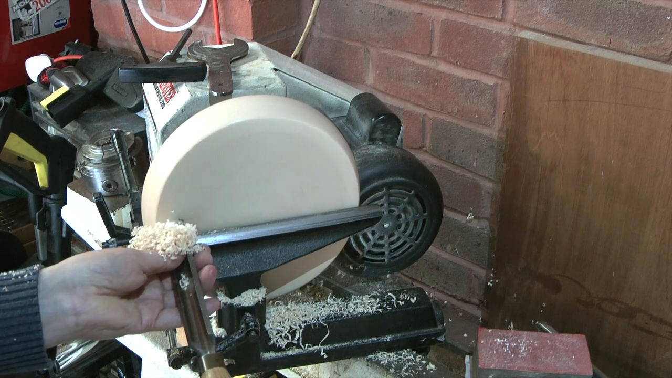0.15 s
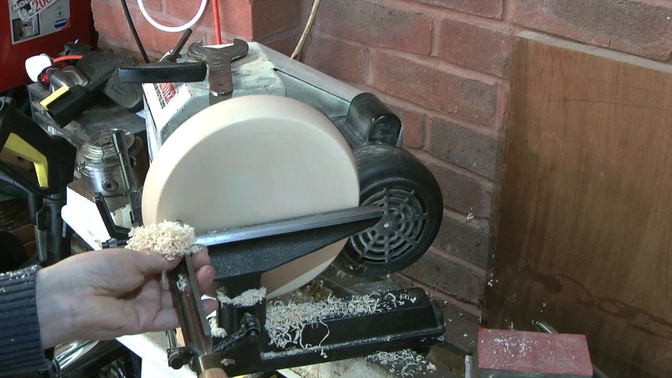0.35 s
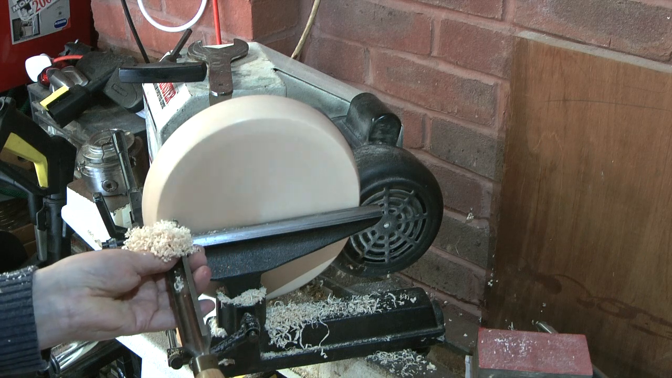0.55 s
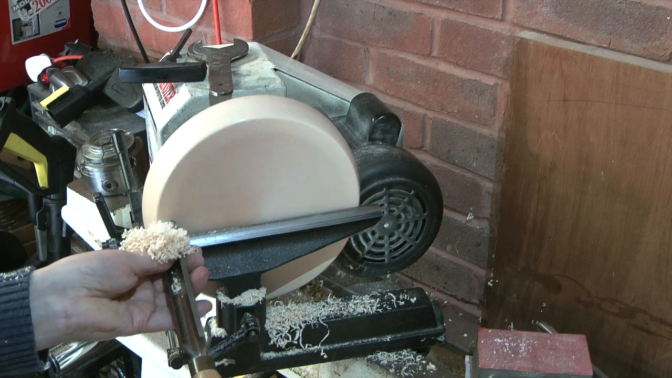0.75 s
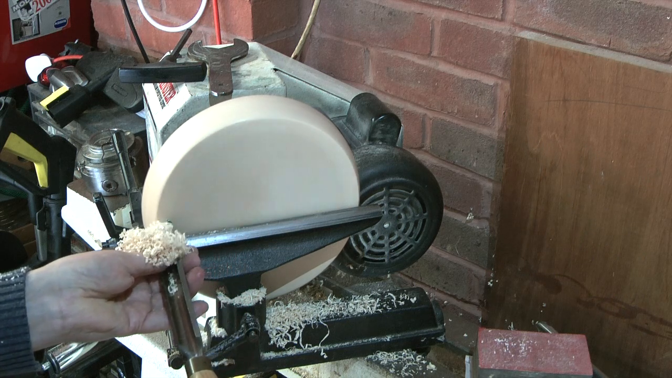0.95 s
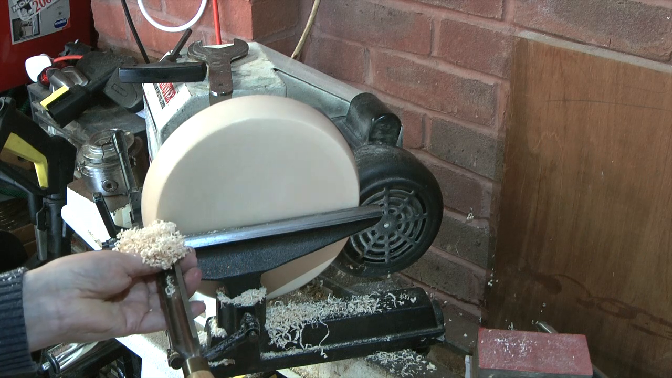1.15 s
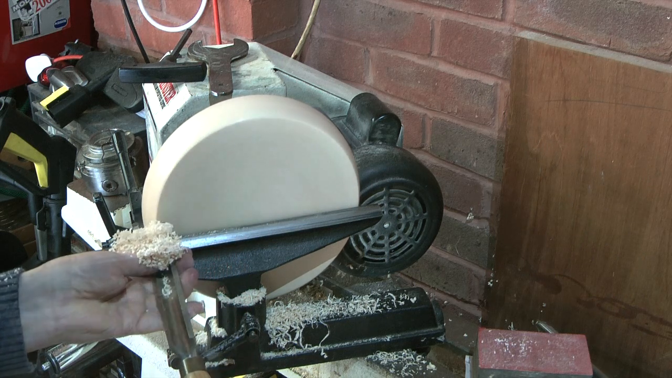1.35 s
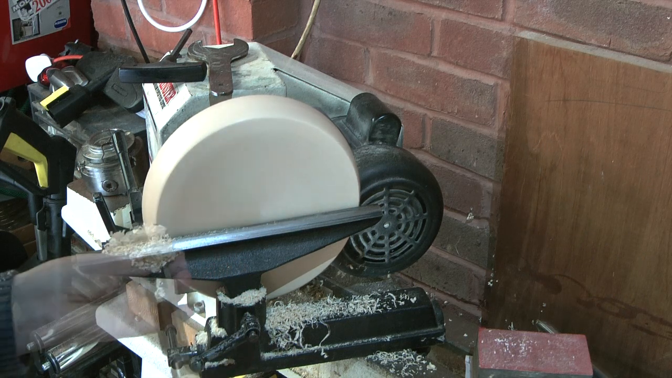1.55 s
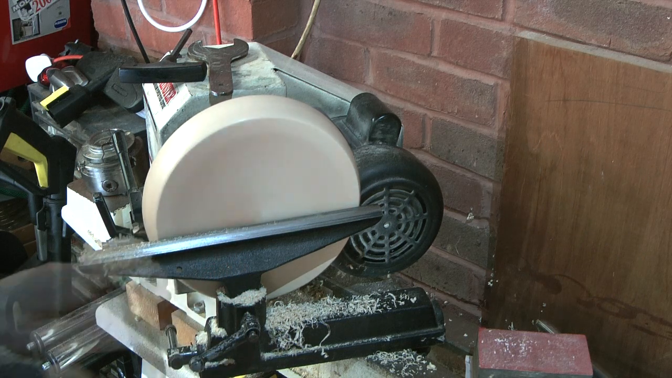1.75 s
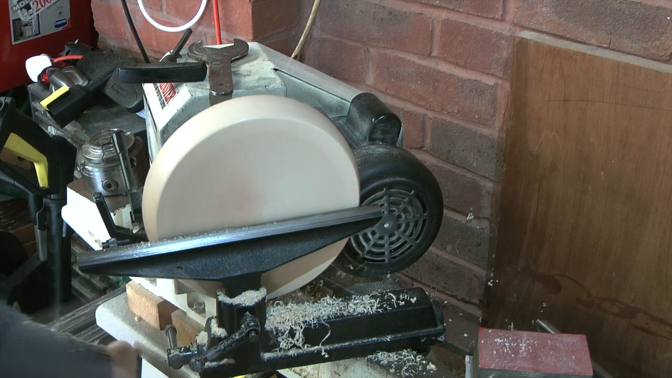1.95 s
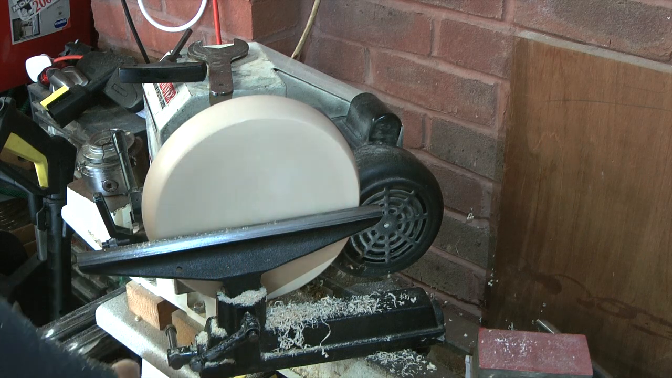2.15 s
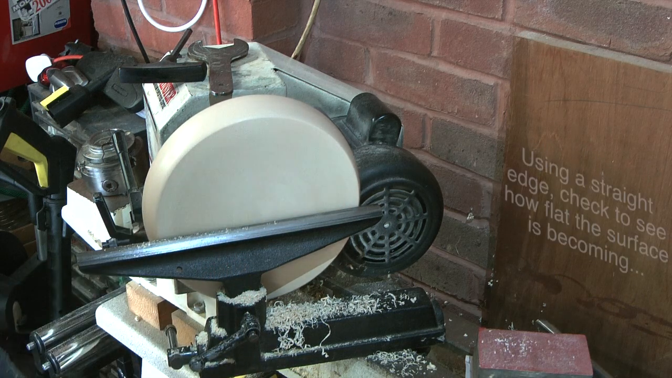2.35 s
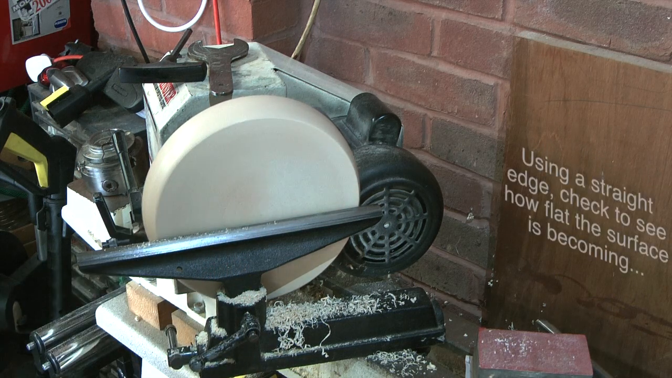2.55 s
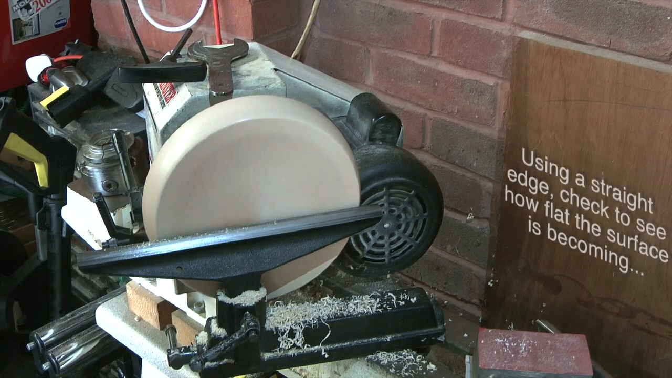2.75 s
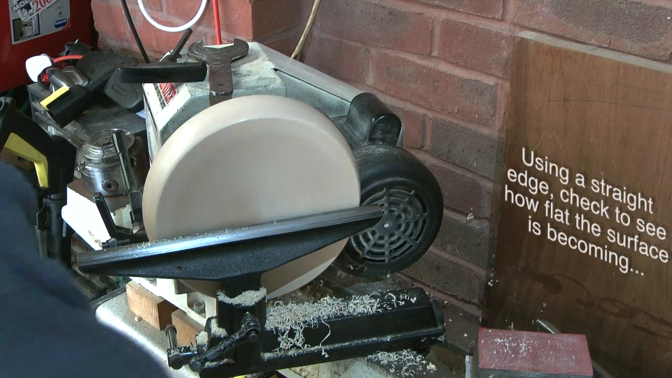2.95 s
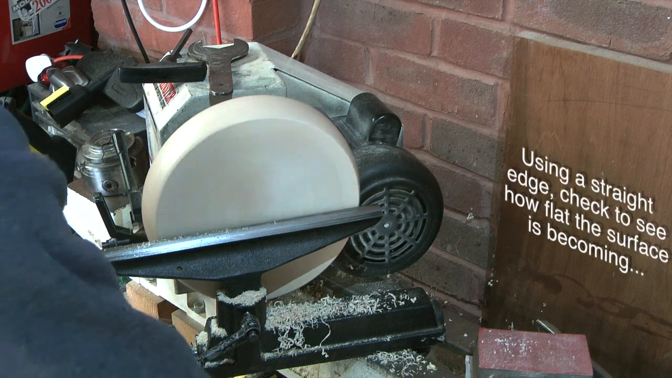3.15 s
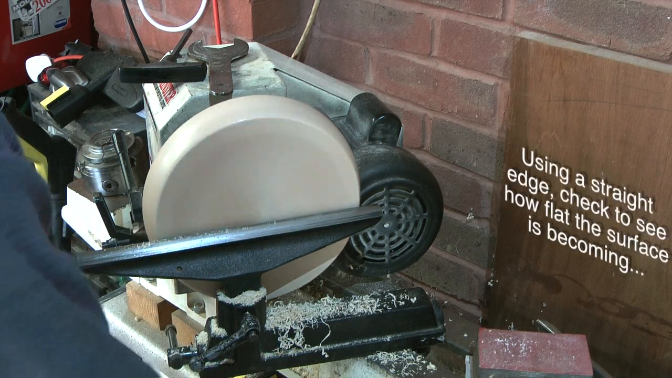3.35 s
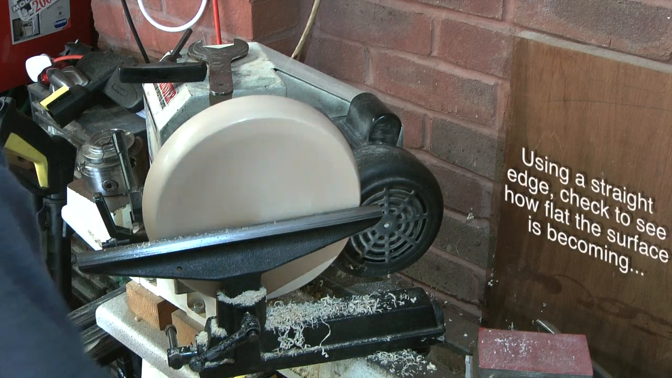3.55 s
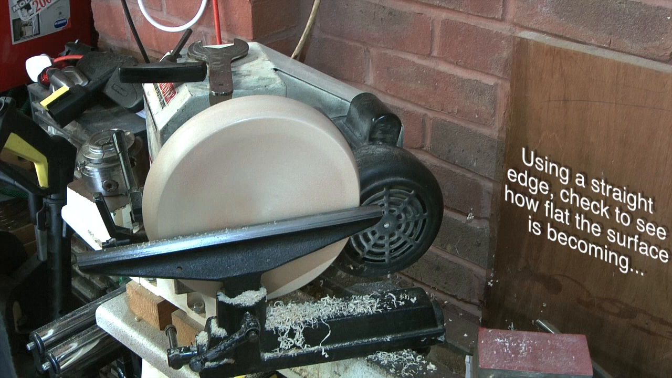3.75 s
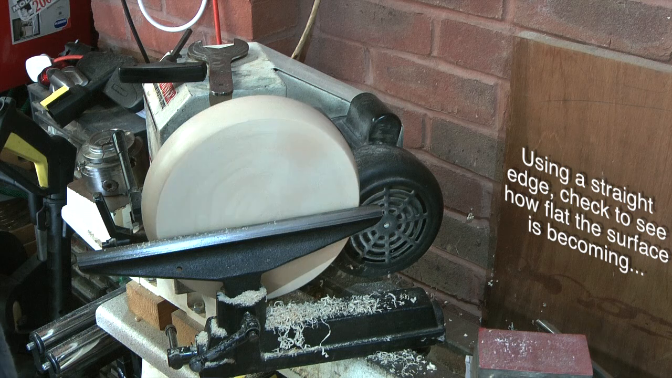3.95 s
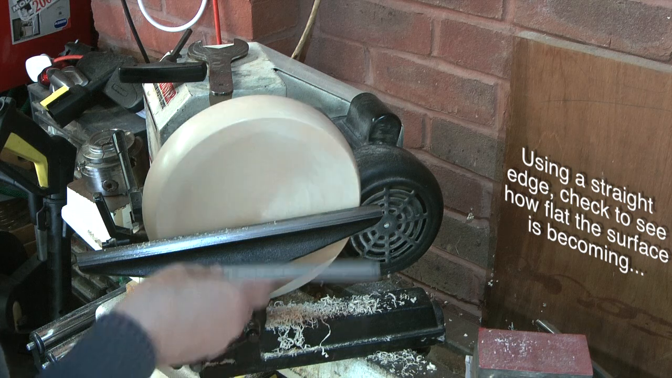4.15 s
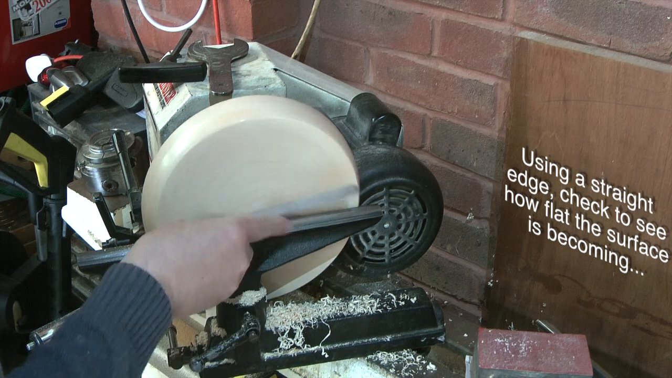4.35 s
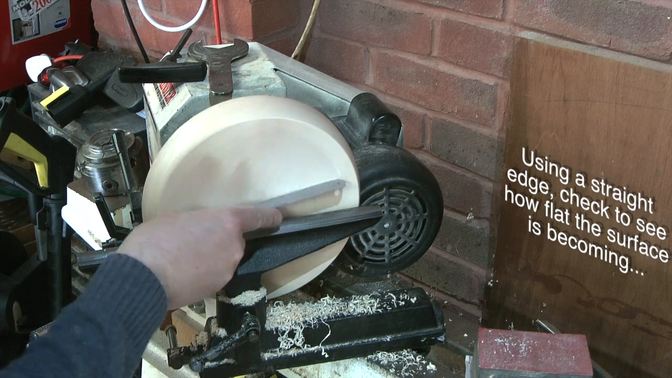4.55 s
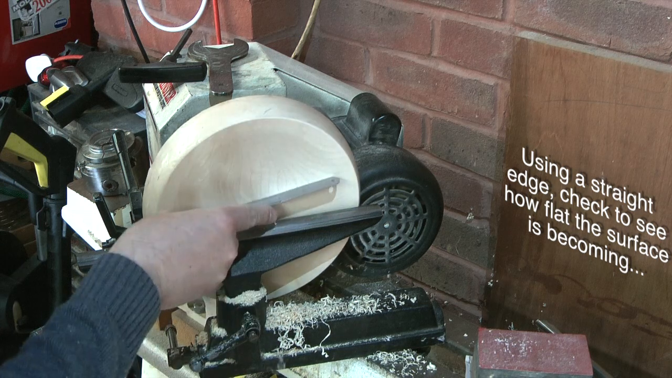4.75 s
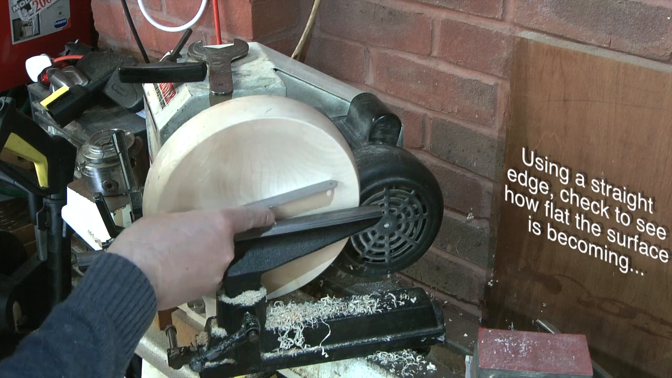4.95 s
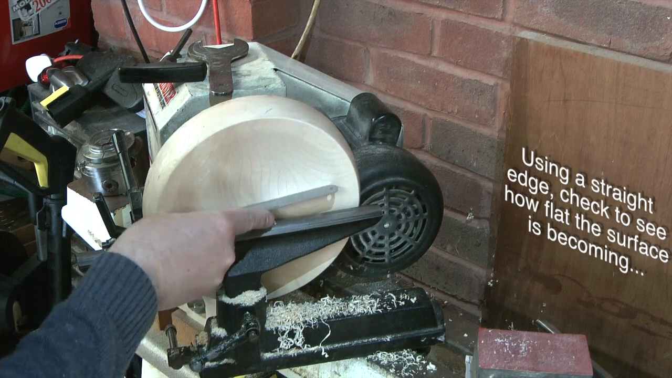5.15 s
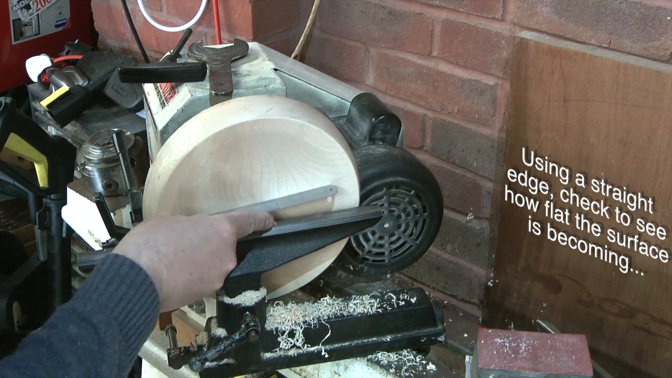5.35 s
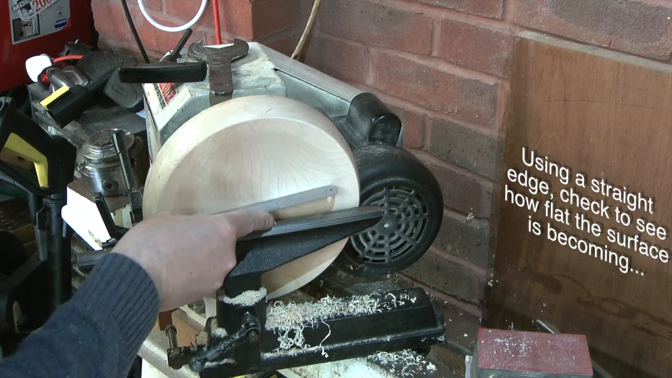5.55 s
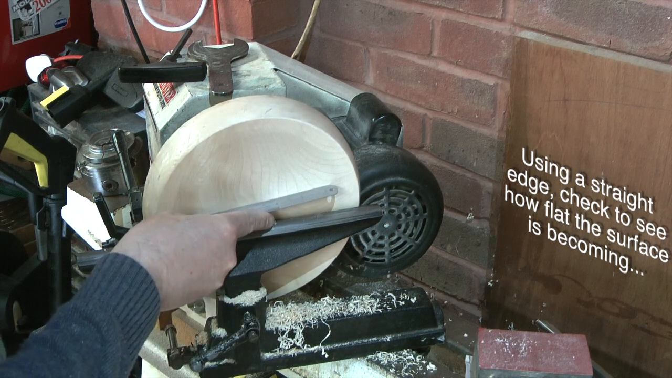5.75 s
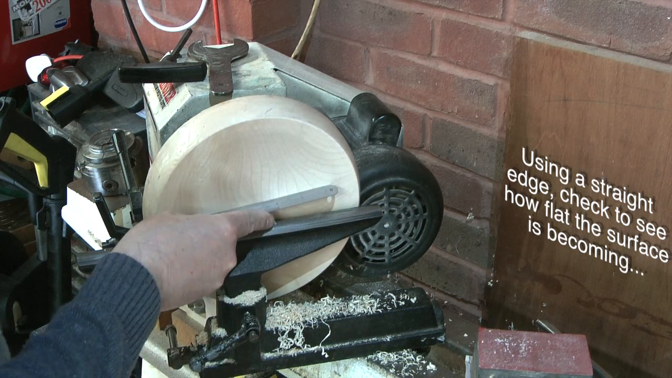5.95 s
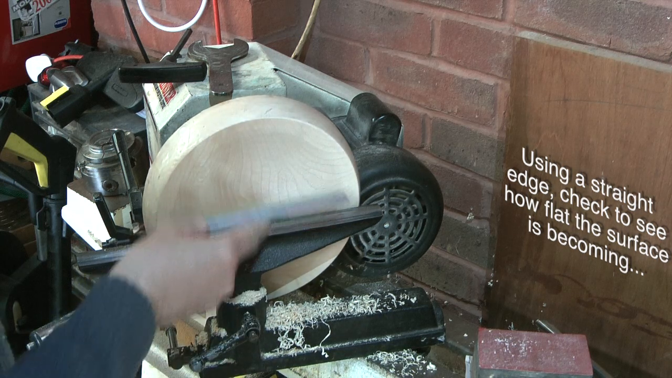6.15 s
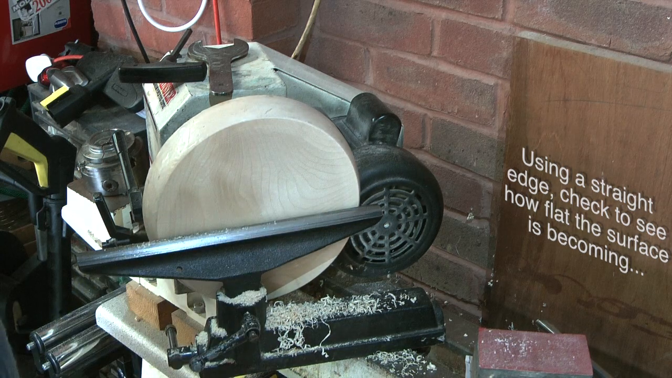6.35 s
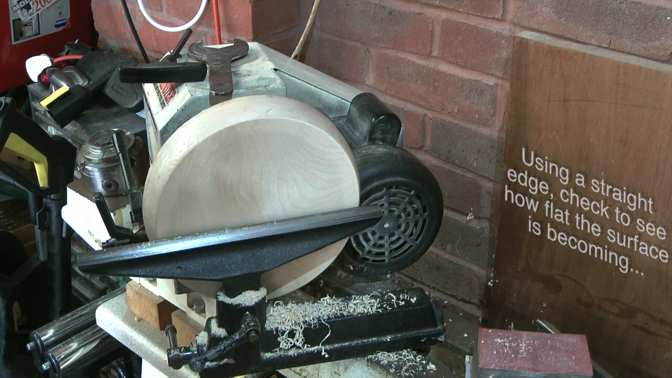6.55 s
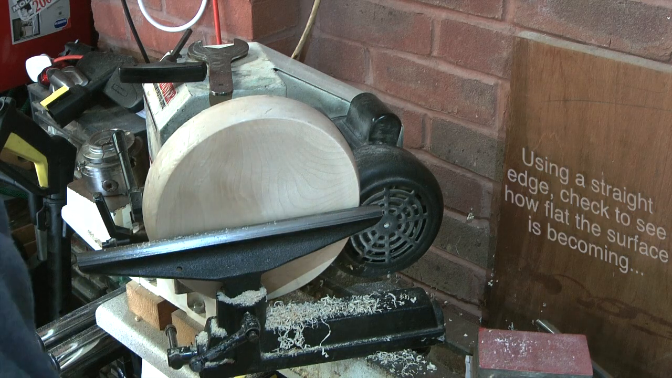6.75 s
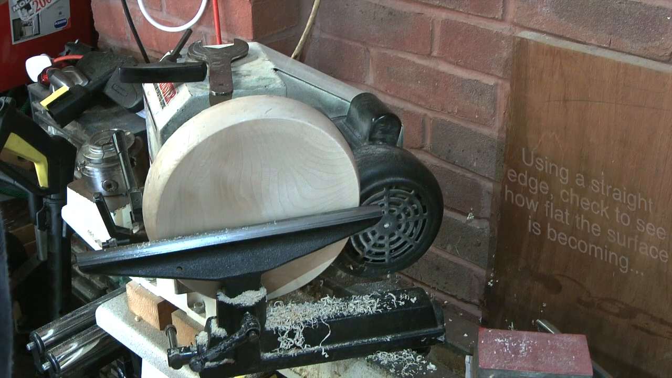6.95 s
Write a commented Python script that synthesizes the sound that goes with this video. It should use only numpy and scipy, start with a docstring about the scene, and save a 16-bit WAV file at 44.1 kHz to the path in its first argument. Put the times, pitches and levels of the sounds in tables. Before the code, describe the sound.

A gouge hisses on a humming wood lathe, which is switched off and rubs slowly to rest while a steel rule jingles.

```python
"""Wood lathe coasting to rest

A lathe runs in a small brick workshop while a gouge shaves the face of a spinning disc.
The gouge lifts and the motor is switched off; as it coasts, its centrifugal switch drops in
and rubs once a turn until standstill. A steel rule, picked up, held against the disc and put
down, jingles in its free modes of vibration."""
import sys
import numpy as np
from scipy import signal
from scipy.fft import rfft, irfft, next_fast_len
from scipy.io import wavfile
from scipy.ndimage import uniform_filter1d

SR = 44100
rng = np.random.default_rng(int(sys.argv[2]) if len(sys.argv) > 2 else 0)


def master_out(mix):
    """Clip the mix to full scale and print it as 16-bit PCM to the path in sys.argv[1]."""
    frames = np.transpose(np.atleast_2d(mix))
    ceiling = np.clip(frames, -1, 1)
    pcm = np.round(ceiling * 32767).astype(np.int16)
    wavfile.write(sys.argv[1], SR, pcm)


N = 312228
TIME = np.arange(N) / SR
FFT_SIZE = next_fast_len(N, real=True)
BIN_HZ = np.maximum(np.arange(FFT_SIZE // 2 + 1) * SR / FFT_SIZE, 1)
SWITCH_OFF_S = 2.262
DROP_IN_S, DROP_IN_HZ = 2.96, 18.67   # time and motor speed at which the centrifugal switch closes


def from_db(db):
    """Amplitude ratio of a level in decibels."""
    return 10 ** (np.asarray(db) / 20)


def unit_rms(x):
    """Normalisation to unit mean power."""
    return x / np.sqrt(np.mean(x ** 2) + 1e-20)


def pan(right_db):
    """Level panning: the right channel gains what the left loses."""
    return from_db([[-right_db], [right_db]])


def over_bins(points):
    """Interpolation of (frequency_hz, value) points on a logarithmic frequency axis."""
    hz, value = np.transpose(points)
    return np.interp(np.log(BIN_HZ), np.log(hz), value)


def drift(rate_hz):
    """Low-passed Gaussian fluctuation of unit rms."""
    spectrum = rfft(rng.standard_normal(FFT_SIZE)) / (1 + (BIN_HZ / rate_hz) ** 2)
    return unit_rms(irfft(spectrum, FFT_SIZE)[:N])


def grains(spread_db):
    """Log-normal strengths of tiny contacts, about a millisecond each."""
    return from_db(spread_db * drift(720))


def dies_after(start_s, decay_s):
    """Unity until start_s, then exponential decay."""
    return np.exp(-np.maximum(TIME - start_s, 0) / decay_s)


def blows(rows, decay_s):
    """Envelope of damped impacts (start_s, level_db), which add in power."""
    return np.sqrt(sum((from_db(db) * (TIME >= s) * dies_after(s, decay_s)) ** 2 for s, db in rows))


def strokes(rows, rise_s, decay_s):
    """Envelope of sustained contacts (start_s, length_s, level_db)."""
    return sum(from_db(db) * np.clip((TIME - s) / rise_s, 0, 1) * dies_after(s + length_s, decay_s)
               for s, length_s, db in rows)


def resonances(modes):
    """Modal superposition of (pitch_hz, bandwidth_hz, gain_db), with alternating signs."""
    return sum((-1) ** k * from_db(db) / (1 + 1j * (BIN_HZ ** 2 - hz ** 2) / (BIN_HZ * width_hz))
               for k, (hz, width_hz, db) in enumerate(modes))


# left-right likeness of nearby sources: frequency_hz, coherence
NEAR_COHERENCE = [(60, 0.75), (250, 0.87), (600, 0.94), (1000, 0.81), (2000, .94), (4000, 0.99), (12000, 1)]

def noise(response, coherence=NEAR_COHERENCE, excite=1):
    """Source-filter stereo noise of unit rms; coherence divides its power between mid and side."""
    shares = np.sqrt(1 + np.clip(over_bins(coherence), -1, 1) * [[1], [-1]])
    source = rfft(rng.standard_normal((2, N)) * excite, FFT_SIZE)
    mid, side = irfft(source * response * shares, FFT_SIZE)[:, :N]
    return unit_rms(mid + side * np.array([[1], [-1]]))


def coloured(spectrum, coherence=NEAR_COHERENCE, excite=1):
    """Broadband noise with a relative spectral density (frequency_hz, density_db)."""
    return noise(from_db(over_bins(spectrum)), coherence, excite)


# steady background noise: frequency_hz, density_db
BACKGROUND_SPECTRUM = [(15, -51), (25, -15), (55, -8.5), (102, -13), (161, -2), (200, -4), (284, -1),
                       (342, -8.5), (371, -5.5), (981, -0.5), (1980, -12.5), (2520, -21.5), (7420, -28.5),
                       (10800, -35.5), (15800, -34)]
# its left-right likeness: frequency_hz, coherence
BACKGROUND_COHERENCE = [(60, 0.72), (150, 0.91), (380, 0.84), (950, 0.69), (2380, 0.81), (5980, 1),
                        (15000, 0.97)]
# it comes up slightly as the recorder's gain recovers: time_s, level_db
BACKGROUND_LEVEL = [(4.7, -42), (7.0, -39)]

def background_noise():
    """Ambient noise, partly coherent between the channels, under a gain that rises toward the end."""
    level_db = np.interp(TIME, *np.transpose(BACKGROUND_LEVEL))
    return from_db(level_db) * coloured(BACKGROUND_SPECTRUM, BACKGROUND_COHERENCE) * pan(-.2)


def reverberate(dry, t60_s=0.33, wet_db=-8):
    """Dense reflections from close brick walls form an exponentially decaying impulse response."""
    spectrum = [(100, -9), (1000, -3), (6000, -4), (16000, -10.5)]
    tail = coloured(spectrum, coherence=[(100, 1), (12000, 1)])
    tail *= (TIME > .004) * from_db(-60 * TIME / t60_s)
    tail = tail[:, :SR // 2] / np.sqrt(np.sum(tail ** 2) / 2)
    return dry + from_db(wet_db) * signal.fftconvolve(dry, tail, axes=1)[:, :N]


# soft bumps and shuffles: start_s, length_s, level_db
BUMP_CONTACTS = [(3.155, 0.021, -38.5), (6.44, 0.2, -48.5), (6.7, 0.12, -47.5), (6.94, .13, -45)]
# their dull thud: frequency_hz, density_db
BUMP_SPECTRUM = [(25, -8), (60, -8), (130, 6), (230, 7.5), (330, 4), (900, -45)]

def bumps():
    """Soft contacts carry their energy at low frequencies."""
    return strokes(BUMP_CONTACTS, rise_s=0.0058, decay_s=0.017) * coloured(BUMP_SPECTRUM)


# dry scuffs as the turner steps away: start_s, length_s, level_db
SCUFF_CONTACTS = [(1.82, 0.037, -37.5), (1.955, 0.016, -34), (2.008, 0.012, -28.5), (2.095, 0.048, -31)]
# snaps of the off button: start_s, level_db
BUTTON_SNAPS = [(2.2385, -14), (2.248, -21.5)]
# colour of both: frequency_hz, density_db
SNAP_SPECTRUM = [(200, -23), (900, 4), (2000, 7), (3500, 3), (6500, 1), (7700, -7.5), (9800, -8),
                 (11500, -20), (14000, -16), (16000, -28)]

def scuffs_and_button():
    """Brief contacts radiate broadband bursts: a few scuffs, then the off button."""
    scuffs = strokes(SCUFF_CONTACTS, rise_s=0.0073, decay_s=.012)
    snaps = blows(BUTTON_SNAPS, decay_s=0.0063)
    return (scuffs + snaps) * coloured(SNAP_SPECTRUM, excite=grains(2.3))


# contacts of the rule, levels relative: start_s, chatter_decay_s, ring_db, tick_db, knock_db
RULE_CONTACTS = [(3.246, 0.013, -26, -43, -60), (3.613, .024, -39.5, -49, -60),
                 (4.548, 0.021, -46, -53, -34), (4.613, .11, -47, -52, -45), (4.735, .046, -55, -46.5, -40),
                 (5.075, .02, -57, -60, -50), (6.576, 0.0086, -47, -25, -26.5),
                 (6.6592, 0.029, -25.5, -28.5, -34), (6.693, 0.044, -27, -43, -47),
                 (6.836, 0.0095, -25, -45, -31), (6.843, 0.015, -19, -48, -54),
                 (6.909, 0.0057, -32, -46, -54)]
# free vibrations of the steel: pitch_hz, level_db, t60_s
STEEL_MODES = [(2684, -19.5, 0.058), (3930, -26, 0.11), (4480, -33, 0.088), (6280, -7.5, 0.13),
               (6850, -6, 0.13), (7054, 3.5, 0.074), (7170, 5.5, 0.068), (7550, 2, 0.063), (7730, 0, 0.12),
               (8140, -5, .14), (8520, -3, 0.18), (8807, -12, .12), (9260, -2.5, .1), (10200, -9, 0.079),
               (11000, -6.5, 0.15), (12200, -11, 0.086), (12900, -16, .1), (13650, -17, .11),
               (14150, -17, .08), (14950, -20, .08)]
# bright contact tick: frequency_hz, density_db
TICK_SPECTRUM = [(2000, -16), (5500, -3), (7500, 7.5), (9500, -2.5), (13000, -7), (16000, -13)]
# knock on wood: frequency_hz, density_db
KNOCK_SPECTRUM = [(100, -27), (400, -4), (850, 2.5), (1150, 0), (1400, -5), (1700, 0.5), (2200, -8),
                  (2700, -6.5), (4000, -8.5), (9000, -24)]

def steel_rule(touches_per_s=1800, ring_trim_db=-1, impact=0.44):
    """Impact excitation: each blow and its dying chatter ring damped steel modes and knock on wood."""
    length = SR // 3
    t = np.arange(length) / SR
    rings, tick, knock = np.zeros(N + length), np.zeros(N), np.zeros(N)
    for start_s, decay_s, ring_db, tick_db, knock_db in RULE_CONTACTS:
        touches = (rng.random(length) < touches_per_s / SR) * np.exp(-t / decay_s)
        ringing = 0
        for hz, db, t60_s in STEEL_MODES:
            radius, angle = from_db(-60 / (t60_s * SR)), 2 * np.pi * hz / SR
            force = impact * (t == 0) + touches * rng.standard_normal(length)
            mode = signal.lfilter([1], [1, -2 * radius * np.cos(angle), radius ** 2], force + 1e-18)
            ringing += from_db(db + rng.normal(0, 1)) * unit_rms(mode)
        start = round(start_s * SR)
        peak_rms = np.sqrt(uniform_filter1d(ringing ** 2, size=256).max())
        rings[start:start + length] += from_db(ring_db + ring_trim_db) * ringing / peak_rms
        contact = np.exp(-TIME[:N - start] / decay_s)
        tick[start:] += from_db(tick_db) * contact
        knock[start:] += from_db(knock_db) * contact
    chatter = grains(2.8)
    ticks = tick * coloured(TICK_SPECTRUM, excite=chatter)
    knocks = knock * coloured(KNOCK_SPECTRUM, excite=chatter)
    return (rings[:N] + ticks + knocks) * pan(-1.1)


def motor_speed(free_slowing_hz_per_s=7.3, friction_hz_per_s=4.778, drag_per_turn=.06037):
    """Turns per second: uniform deceleration, then dry friction and quadratic drag from the drop-in."""
    since_s = TIME - DROP_IN_S
    knee_hz = np.sqrt(friction_hz_per_s / drag_per_turn)   # here drag equals friction
    angle = np.arctan(DROP_IN_HZ / knee_hz) - drag_per_turn * knee_hz * np.maximum(since_s, 0)
    braked_hz = knee_hz * np.tan(np.maximum(angle, 0))
    return braked_hz - free_slowing_hz_per_s * np.clip(since_s, SWITCH_OFF_S - DROP_IN_S, 0)


def motor_turns():
    """Rotation is the integral of speed; the count is whole where the switch collar touches."""
    turns = np.cumsum(motor_speed()) / SR
    return turns - np.interp(DROP_IN_S, TIME, turns) - .041


def once_a_turn(after_s, lead_turns=0):
    """Periodic contact: times and speeds at which one spot of the shaft comes round."""
    passes = np.flatnonzero(np.diff(np.floor(motor_turns() + lead_turns)))
    passes = passes[TIME[passes] > after_s]
    return TIME[passes], motor_speed()[passes]


def coasting_db(speed_hz, drop_in_db, db_per_hz):
    """Level is linear in motor speed, passing drop_in_db at the drop-in."""
    return drop_in_db + db_per_hz * (speed_hz - DROP_IN_HZ)


# impacts of the closing switch: start_s, level_db
SWITCH_IMPACTS = [(2.953, -23), (2.961, -16.5), (2.978, -15.5), (2.99, -35)]
# their clack: frequency_hz, density_db
CLACK_SPECTRUM = [(150, -25), (400, -20), (700, -4), (1200, -24), (2500, -5), (3600, 0), (4500, -5),
                  (5200, -1), (6800, 8), (7700, 0.5), (9500, 6), (11300, -8), (16000, -3)]
# resonances of the motor's end cover: pitch_hz, bandwidth_hz, gain_db
COVER_MODES = [(670, 31, -1), (805, 41, -7), (1060, 190, -14), (2160, 35, -2), (2555, 72, -2.5),
               (4510, 140, 6), (5870, 88, 1.5), (6700, 160, 5), (8300, 80, 1), (9530, 130, 5)]

def centrifugal_switch():
    """The closing switch shock-excites the end cover, whose low modes outlast the clack."""
    clack = from_db(-5) * coloured(CLACK_SPECTRUM)
    cover = from_db(-2) * noise(resonances(COVER_MODES))
    after_ring = blows([(2.965, -26.5)], decay_s=0.077) * noise(resonances(COVER_MODES[:3]))
    return blows(SWITCH_IMPACTS, decay_s=0.017) * (clack + cover) + after_ring


# scrape of the switch collar: frequency_hz, density_db
SCRAPE_SPECTRUM = [(250, -16), (700, -22), (1600, -14), (2200, 3), (3400, 3.5), (4100, 8), (4500, 3),
                   (5000, 7), (6100, 3), (7400, 8), (8500, -1), (9800, 12), (11500, -4), (16000, -13)]
# resonances of the collar: pitch_hz, bandwidth_hz, gain_db
COLLAR_MODES = [(2126, 50, 0), (2626, 38, 2), (3990, 100, -2), (4345, 130, 4), (4480, 190, 1.5),
                (5900, 80, -5), (6150, 150, -6), (8070, 120, -2), (8540, 150, -2), (9140, 70, -4),
                (9900, 150, -14)]

def collar_rubs(rub_s=.017, stretch_s_per_hz=0.00092):
    """Sliding friction excites the collar once a turn, softer and longer as the motor slows."""
    start_s, speed_hz = once_a_turn(DROP_IN_S + rub_s)
    length_s = rub_s + stretch_s_per_hz * (DROP_IN_HZ - speed_hz)
    level_db = coasting_db(speed_hz, -31, db_per_hz=0.67)
    contact = strokes(zip(start_s, length_s, level_db), rise_s=0.0015, decay_s=0.011)
    scrape = from_db(-6) * coloured(SCRAPE_SPECTRUM, excite=grains(3.3))
    ring = from_db(-3) * noise(resonances(COLLAR_MODES))
    return contact * (scrape + ring)


def chirps_per_turn(length_s=0.013, pitch_hz=2600, scatter_db=1):
    """A brief chirp near 2.6 kHz sounds once a turn, just ahead of the collar's rubbing spot."""
    start_s, speed_hz = once_a_turn(SWITCH_OFF_S, lead_turns=0.13)
    level_db = coasting_db(speed_hz, -41, db_per_hz=0.73)
    level_db += scatter_db * rng.standard_normal(N)[:len(start_s)]
    chirps = [(s, length_s, db) for s, db in zip(start_s, level_db)]
    return strokes(chirps, rise_s=0.0087, decay_s=.005) * noise(resonances([(pitch_hz, 410, 0)]) ** 2)


# bearing and belt tones: multiple_of_motor_speed, level_db
WHIRR_ORDERS = [(12.2, -6.5), (20.5, -13), (24.2, -7.5)]
# bearing rumble: frequency_hz, density_db
RUMBLE_SPECTRUM = [(30, -36), (130, -19), (210, -7), (290, -2.5), (380, 2.5), (450, -2), (620, -2.5),
                   (760, -11), (1300, -9.5), (2500, -62)]
# resonances of the lathe stand: pitch_hz, bandwidth_hz, gain_db
STAND_MODES = [(376.4, 11, -1), (644, 85, -14.5), (943, 11, -12.5), (1202, 40, -17)]
# rolling hiss: frequency_hz, density_db
HISS_SPECTRUM = [(500, -12), (1300, 4.5), (1800, 2), (2800, -7), (3500, -8.5), (5600, -14), (7000, -21.5),
                 (11000, -21.5), (16000, -27)]
# resonances of the bearings: pitch_hz, bandwidth_hz, gain_db
BEARING_MODES = [(1305, 41, 2), (1483, 39, 3.5), (2016, 38, 2.5), (2237, 22, 3), (2640, 32, -1),
                 (5450, 280, -14.5)]

def coasting_lathe(critical_hz=14, critical_width_hz=3.7, critical_db=6, crawl_hz=3, roughness=0.6):
    """Rotational tones sink with speed; the stand keeps its pitch and shakes more at a critical speed."""
    speed_hz, turns = motor_speed(), motor_turns()
    whirr = 0
    for order, db in WHIRR_ORDERS:
        amplitude = from_db(db) * (1 + roughness * drift(8.2))
        whirr += amplitude * np.sin(2 * np.pi * order * turns + roughness * drift(2.9))
    rumble = from_db(-3) * coloured(RUMBLE_SPECTRUM)
    stand = from_db(-6) * noise(resonances(STAND_MODES))
    grit = grains(2.0)
    hiss = from_db(-1) * coloured(HISS_SPECTRUM, excite=grit)
    bearings = from_db(-3) * noise(resonances(BEARING_MODES), excite=grit)
    shaking_db = critical_db * np.exp(-((speed_hz - critical_hz) / critical_width_hz) ** 2)
    running = (from_db(coasting_db(speed_hz, -31.5, db_per_hz=1.0) + shaking_db) * (rumble + stand)
               + from_db(coasting_db(speed_hz, -39, db_per_hz=1.03)) * (hiss + bearings)
               + from_db(coasting_db(speed_hz, -35.5, db_per_hz=2.5)) * whirr
               + chirps_per_turn())
    onset = 1 - dies_after(SWITCH_OFF_S, 0.011)
    return running * onset * np.tanh(speed_hz / crawl_hz) * pan(.6)


# two unrelated throbs of the rattle: rate_hz, crest_s
LOAD_THROBS = [(7.4, .061), (4.5, .117)]

def lathe_load(idle_db=0.5, cutting_db=0.9, wander_db=0.1):
    """Amplitude modulation of the driven lathe: a gain near one that throbs more under the cut."""
    depth_db = idle_db + (cutting_db - idle_db) * gouge_contact()
    throb = sum(np.cos(2 * np.pi * hz * (TIME - crest_s)) for hz, crest_s in LOAD_THROBS)
    return from_db(depth_db * throb + wander_db * drift(14))


# resonances of the lathe frame: pitch_hz, bandwidth_hz, gain_db
FRAME_MODES = [(328, 50, -6.5), (377, 43, -2), (507, 45.5, -1), (628, 70, -4), (784.7, 33.5, 2),
               (989.6, 19, 1), (1846, 18, -12.5), (2055, 25, -13), (2564, 23, -14.5)]
# belt and bearing rattle: frequency_hz, density_db
RATTLE_SPECTRUM = [(30, -30), (120, -18.5), (220, -11.5), (330, -1.5), (600, -1), (1050, -1.5),
                   (1400, -6.5), (1750, -14.5), (2700, -15), (3400, -24.5), (5500, -26.5), (8000, -35.5),
                   (11000, -40), (16000, -50)]
# magnetic hum: multiple_of_mains, level_db
HUM_HARMONICS = [(2, -33.5), (4, -38.5), (6, -36.5), (8, -28.5), (10, -30.5), (12, -31), (24, -54)]

def powered_lathe(mains_hz=50, rattle_db=-18, buzz=.6, waver=.3, flutter_rad=0.17):
    """Forced vibration: torque pulses at twice the mains frequency hum and shake the rattling frame."""
    load = lathe_load()
    mains_phase = 2 * np.pi * mains_hz * TIME
    torque = (1 + buzz * np.cos(2 * mains_phase)) ** 2
    frame = from_db(-3) * load * noise(resonances(FRAME_MODES), excite=torque)
    rattle = from_db(-5) * np.sqrt(load) * coloured(RATTLE_SPECTRUM, excite=grains(1.7))
    hum = 0
    for harmonic, db in HUM_HARMONICS:
        # the lowest tone is steady; higher ones come from loose parts and surge with the load
        looseness = np.clip((harmonic - 2) / 6, 0, 1)
        swell = load ** looseness * (1 + waver * looseness * drift(1.6))
        phase = harmonic * mains_phase + flutter_rad * looseness * drift(6) + rng.uniform(0, 2 * np.pi)
        hum += from_db(db) * np.sqrt(2) * swell * np.sin(phase)
    # the rotor's fading field keeps the lowest tone alive for a moment, slightly flat
    field = (1 - dies_after(SWITCH_OFF_S, 0.026)) * dies_after(SWITCH_OFF_S, 0.1)
    after_hum = from_db(-33.5) * field * np.sin(2 * np.pi * 93 * TIME)
    power = dies_after(SWITCH_OFF_S, 0.024)
    return from_db(rattle_db) * (frame + rattle) * power * pan(.3) + (hum * power + after_hum) * pan(1.8)


def gouge_contact(lift_s=1.332, decay_s=0.074):
    """Coupling of gouge and wood: unity in the cut, decaying as the tool lifts."""
    return dies_after(lift_s, decay_s)


# hiss of the shaving: frequency_hz, density_db
SHAVING_SPECTRUM = [(1000, -11), (2500, -9), (4000, -4.5), (6400, -4), (7600, -8.5), (10000, -5.5),
                    (12500, -11.5), (16000, -13)]
# resonances of the gouge: pitch_hz, bandwidth_hz, gain_db
GOUGE_MODES = [(2560, 55, 5), (3610, 34, 1), (4860, 76, 3.5), (5150, 38, 1), (5900, 61, -2),
               (6385, 56, 0.5), (8910, 50, 3.5), (10600, 120, -14), (14300, 160, -6)]

def gouge(spindle_hz=13.97, first_bite_s=.05, cut_db=-28.5, easing_db_per_s=4.5, sharpness=4.5):
    """Fracturing fibres excite the tool; end grain meets it twice a turn, the harder bite throws chips."""
    alignment = np.cos(2 * np.pi * spindle_hz * (TIME - first_bite_s))
    hard_bite = np.exp(sharpness * (alignment - 1))
    soft_bite = np.exp(-sharpness * (alignment + 1))
    bite_db = (10 * hard_bite + 6 * soft_bite) * (1 + 0.18 * drift(13))
    fibres = from_db(bite_db) * grains(2.0)
    shaving = from_db(-.5) * coloured(SHAVING_SPECTRUM, excite=fibres)
    ring = from_db(-3.5) * noise(resonances(GOUGE_MODES), excite=fibres)
    chips = from_db(-9) * noise(resonances([(11100, 5700, 0)]), excite=hard_bite * grains(1.9))
    pressure = from_db(cut_db - easing_db_per_s * TIME)   # the turner slowly eases off
    return pressure * gouge_contact() * (shaving + ring + chips)


def scene():
    """Superposition of background, lathe and tools; only the tools, scuffs and switches reverberate."""
    background = background_noise() + bumps()
    contacts = (gouge() + scuffs_and_button() + centrifugal_switch() + collar_rubs()) * pan(.3)
    contacts += steel_rule()
    return background + powered_lathe() + coasting_lathe() + reverberate(contacts)


def record(dry):
    """Band limiting: a steep elliptic low-pass removes the treble above 15.9 kHz."""
    return signal.sosfilt(signal.ellip(10, .2, 80, 15900, fs=SR, output="sos"), dry)


dry = scene()
out = record(dry)
master_out(out)
```